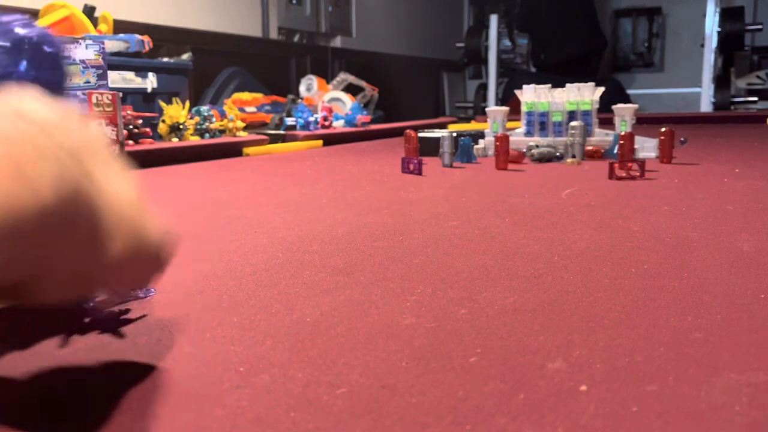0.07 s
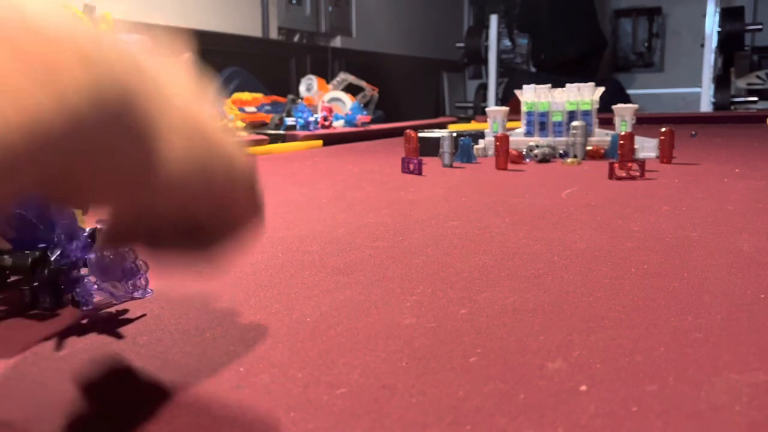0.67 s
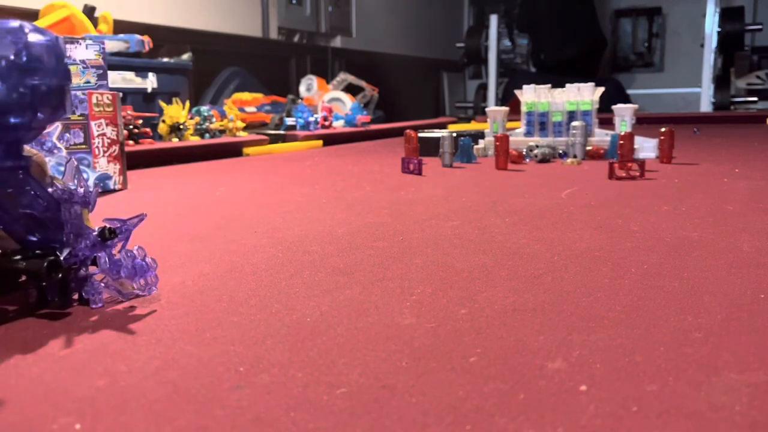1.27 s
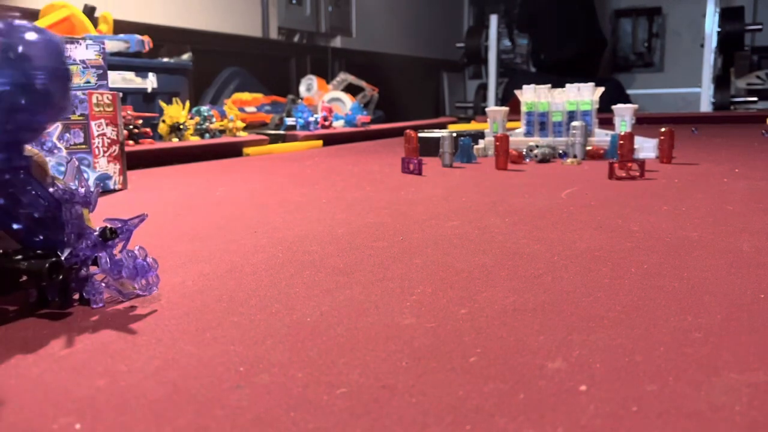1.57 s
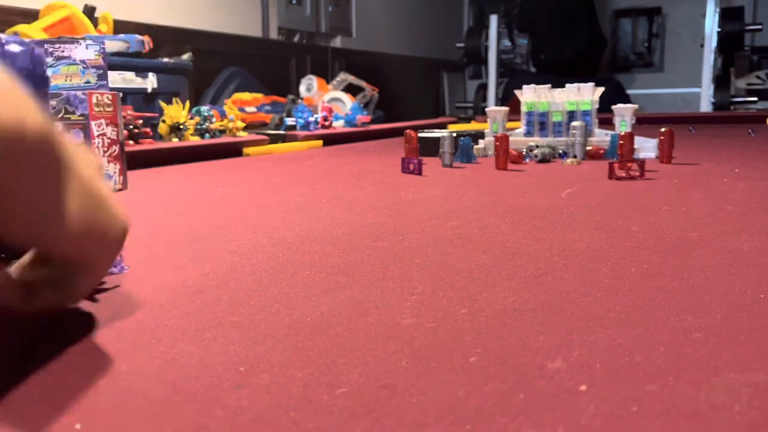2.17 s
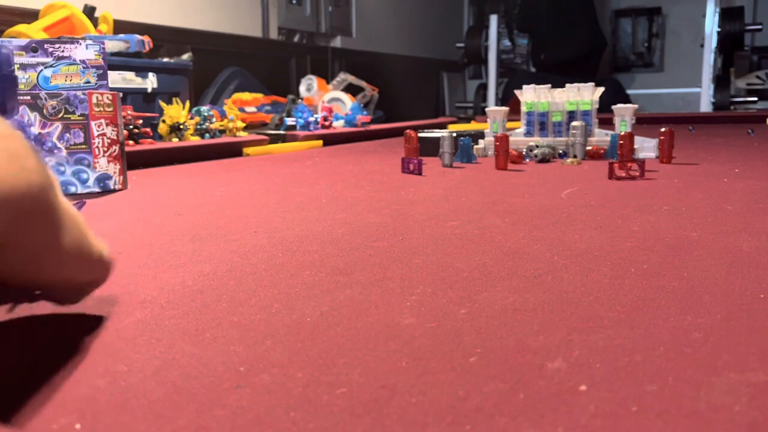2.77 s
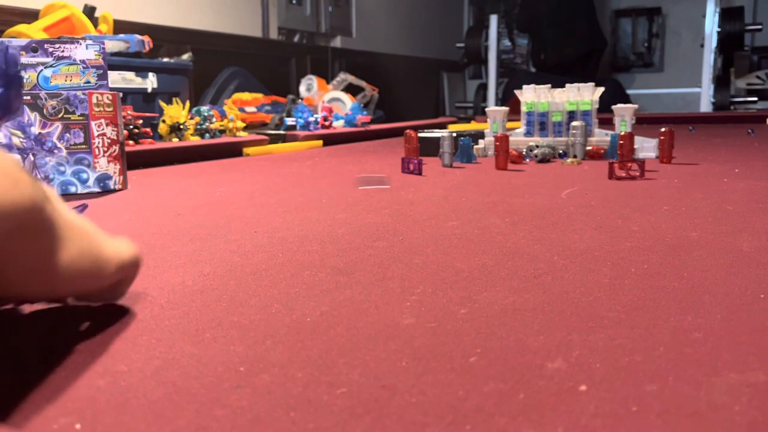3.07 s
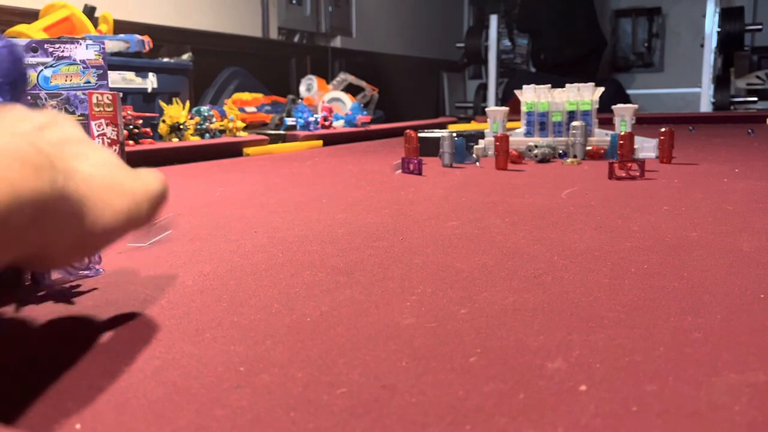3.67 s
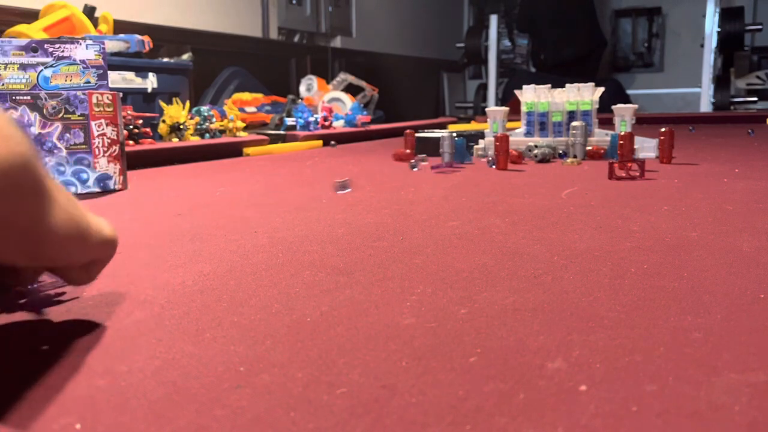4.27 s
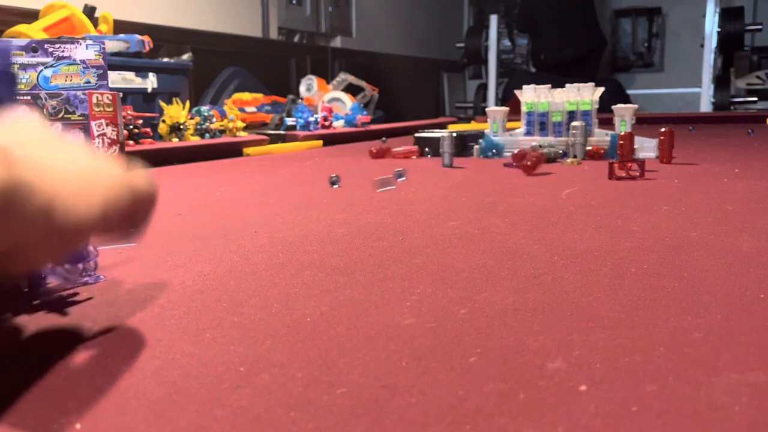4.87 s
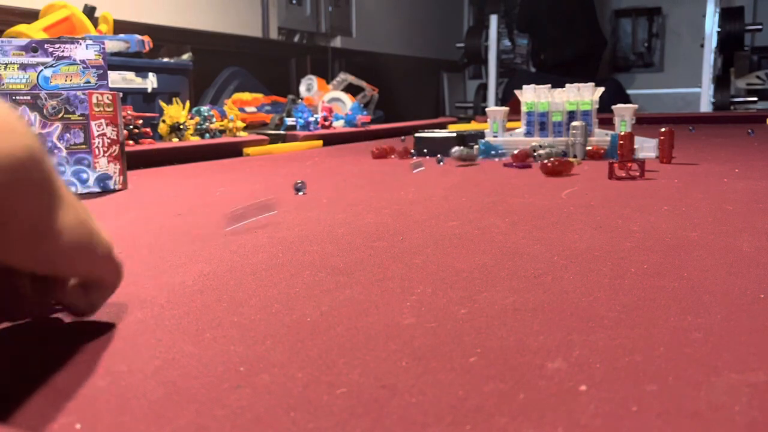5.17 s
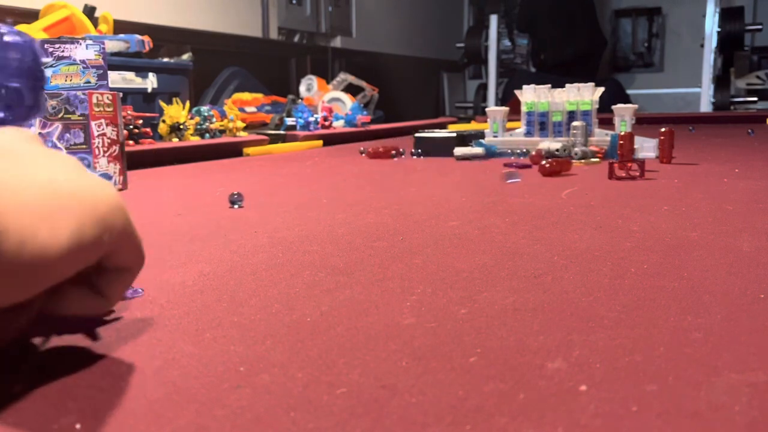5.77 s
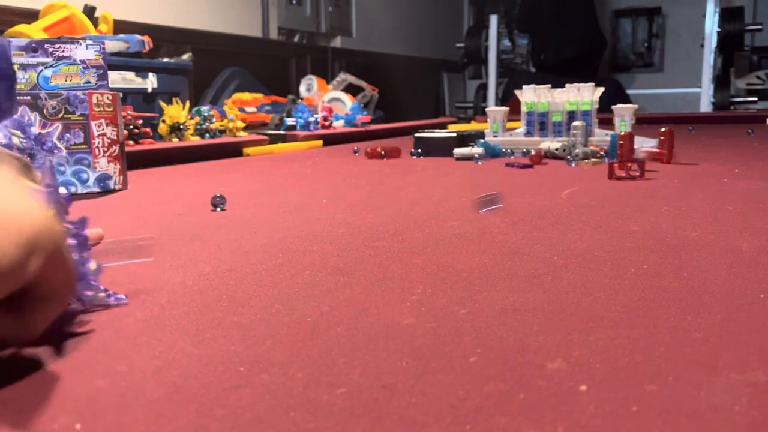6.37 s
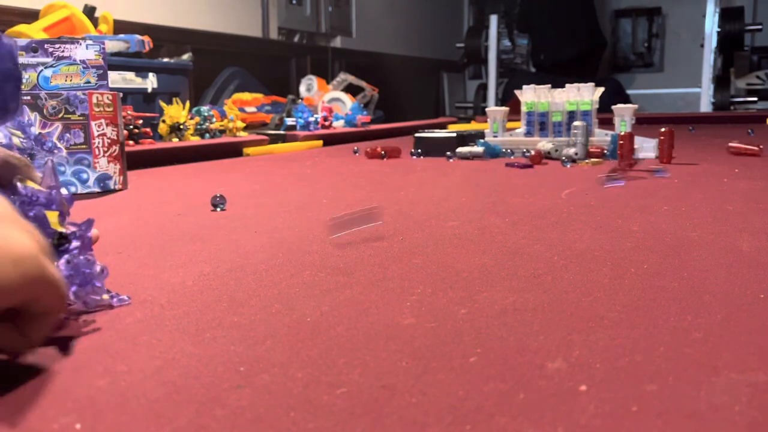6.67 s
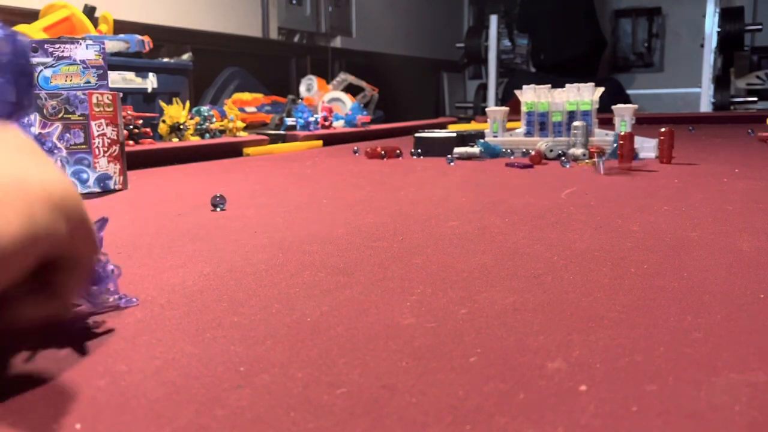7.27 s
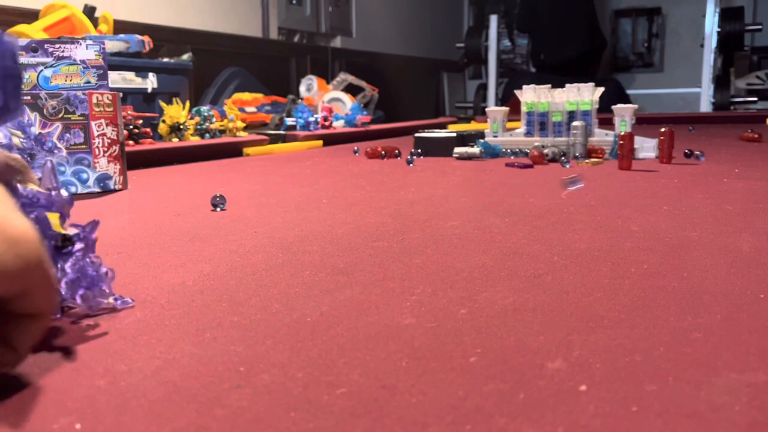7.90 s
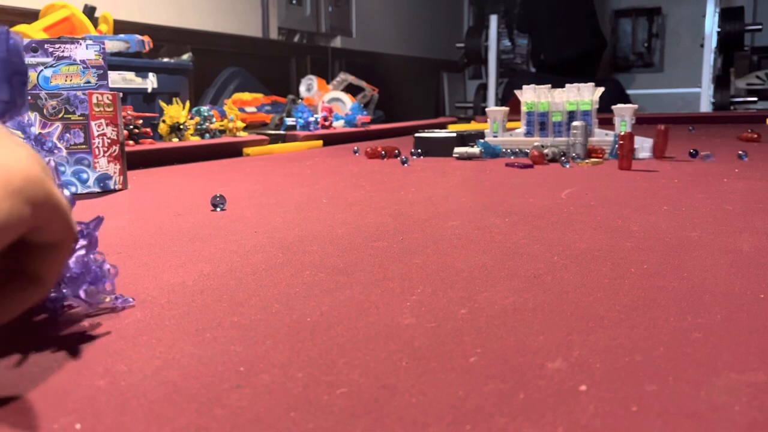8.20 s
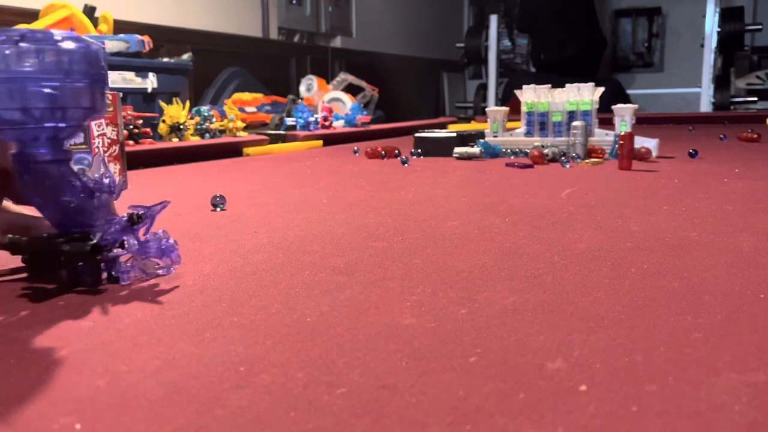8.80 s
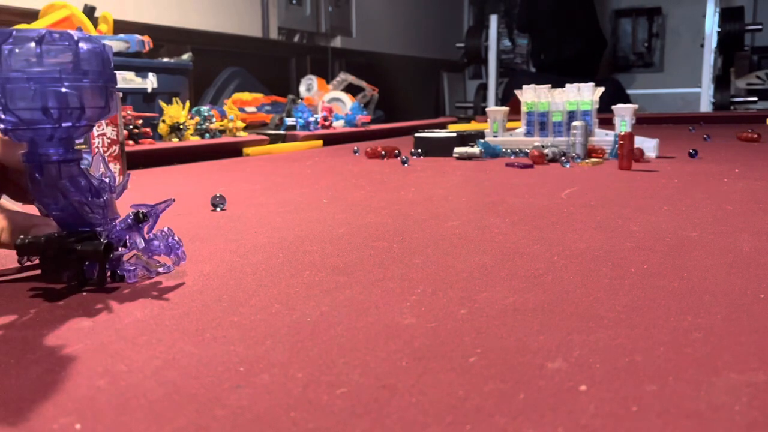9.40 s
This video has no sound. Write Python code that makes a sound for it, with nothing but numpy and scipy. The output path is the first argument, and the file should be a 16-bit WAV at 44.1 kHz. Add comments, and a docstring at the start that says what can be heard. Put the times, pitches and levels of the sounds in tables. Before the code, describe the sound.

For the first two seconds, marbles knock and rattle in the hollow plastic magazine of a toy shooter, close on the left, with sharp trigger clicks around 1 and 1.3 seconds. After a lull with a few faint ticks, firing starts at about 2.9 seconds. Sharp plastic snaps come roughly five times a second, mixed with empty clicks and the rattle of marbles dropping into place. The felt-covered table thuds dully under hard presses near 3, 3.4, 4.3 and 7 seconds. From 3.2 seconds, marbles clack against plastic targets farther away with a little room echo, most densely between 5 and 6 seconds, followed by duller, distant stray hits. The shots weaken and stop at about 8.5 seconds. Just after 9 seconds there is a hollow knock and a brief scrape as the toy is dragged over the felt. Quiet, low ventilation rumble and hum continue throughout.

```python
"""Toy marble shooter on a felt-covered table.

Close to the microphone pair, on the left, a hollow plastic magazine is shaken and its marbles rattle.
Then each press snaps a marble out through sprung claws and lets the next one drop. The marbles roll
off to crack against plastic targets and stray into far pieces; at last the toy is dragged over the
felt. Behind it all, ventilation rumbles and hums in the room."""
import sys
import numpy as np
from scipy import signal
from scipy.fft import rfft, irfft
from scipy.io import wavfile
from scipy.ndimage import uniform_filter1d

SR = 44100
rng = np.random.default_rng(int(sys.argv[2]) if len(sys.argv) > 2 else 0)


def to_wav(sig):
    """Store sig (one row per channel, or 1-D mono) as 16-bit WAV at the path in sys.argv[1].

    Samples outside -1..1 are clipped; the rate is SR.
    """
    pcm = np.clip(np.atleast_2d(sig), -1, 1) * 32767
    pcm = np.round(pcm).astype(np.int16)
    wavfile.write(sys.argv[1], SR, pcm.T)  # frames by channels


N = 416304
TIME = np.arange(N) / SR

# Marbles snapping through the claws. Each row: start in seconds, relative level in dB.
SNAPS = [(2.9089, -5), (3.4453, -2), (3.641, -5), (3.8518, -5), (4.0284, -8.5), (4.2822, -3),
         (4.4781, -4.5), (4.6743, -6.5), (4.8662, -6), (5.0807, -7.5), (5.2546, -7), (5.454, -4.5),
         (5.943, -8), (6.1546, -6), (6.3837, -6), (6.558, -4), (6.7431, -6.5), (7.0091, -5.5), (7.2389, -8),
         (7.422, -7), (7.642, -7.5), (7.8118, -9), (8.0558, -7.5), (8.4495, -15.5)]
# Dry clicks that release no marble: trigger clicks and faint handling ticks of the toy. Each row: start in
# seconds, relative level in dB.
EMPTY_CLICKS = [(0.9778, -5.5), (1.345, -2), (1.35, -2), (2.346, -35.5), (2.534, -41.5), (2.6074, -23),
                (2.7124, -24), (2.8579, -33.5), (3.001, -5), (3.756, -4.5), (5.678, -7.5), (5.913, -6),
                (6.018, -9.5), (6.1, -9.5), (6.2477, -7.5), (6.369, -2), (6.722, -5.5), (7.338, -16),
                (7.458, -10.5), (7.6, -7.5), (8.4281, -14.5), (8.589, -23.5)]
# Tone of a struck plastic piece. Each row: frequency in Hz, relative level in dB.
PIECE_SPECTRUM = [(150, -39.5), (550, -12), (1300, -10.5), (3800, -10), (9000, -15.5), (16000, -27)]
# Phase of a source close on the left. Each row: frequency in Hz, lead of the left channel in radians.
NEAR_LEAD = [(470, 0), (1400, 2.7), (1750, 2.4), (1950, 0)]


def shots(level_db=10, glass_db=-3, rub_db=-5, rub_s=0.0052, click_db=-6):
    """A marble rubs through sprung claws that snap shut and ring the glass; empty clicks are softer."""
    # Tone of the claws. Each row: frequency in Hz, relative level in dB.
    claw_spectrum = [(250, -17), (1200, -3.5), (2500, -20.5), (4100, -2), (5500, -8.5), (7400, -7.5),
                     (9000, -5.5), (14000, -8.5), (16000, -20.5)]
    # Marble and claw modes. Each row: frequency in Hz, relative level in dB, t60 in seconds.
    glass_modes = [(4520, -2, 0.0069), (7250, 1.5, 0.008)]
    contacts, rings = np.zeros((2, N))
    t = TIME[:SR // 6]
    for s, db in list(SNAPS) + [(s, db + click_db) for s, db in EMPTY_CLICKS]:
        add(contacts, s, gain_of(db) * blow(crack_t60=0.0055, ring_t60=0.02, ring_db=-2.5))
        rub = unit(rng.standard_normal(len(t))[:round(rub_s * SR)])
        add(contacts, s - rub_s, gain_of(db + rub_db) * rub)
        ring = 0
        for hz, mode_db, t60 in glass_modes:
            mode = np.sin(2 * np.pi * hz * rng.normal(1, 0.0033) * t) * dying(t, t60)
            ring += gain_of(mode_db) * unit(mode)
        add(rings, s, gain_of(db + rng.normal(glass_db, 2)) * ring)
    return gain_of(level_db) * (colour(contacts, claw_spectrum) + rings)


def magazine(rattle_db=-16.5, recoil_db=-6, knock_db=6, knock_ring_db=27, bounce_ring_db=22.5,
             drop_ring_db=-4, wander=0.035, wander_s=0.04):
    """Marbles knock on the shell and ring the air inside; knocks and shots set the rest bouncing."""
    # Marbles thrown at the wall. Each row: start in seconds, relative level in dB, hollow ring in dB.
    jolts = [(0.0014, -7, -15.5), (0.0593, -9, -22.5), (0.2862, -9, -35.5), (0.3087, -6.5, -15.5),
             (0.5514, -15, -16), (0.9219, -19.5, -11.5), (0.9921, -6.5, -16), (1.0193, -2.5, -20.5),
             (1.2481, -11.5, -12), (1.4861, -2.5, -11), (1.603, -18, -8), (1.7928, -22.5, -17.5),
             (1.9804, -28.5, -8), (2.0178, -25, -23), (2.142, -29, -12), (2.9009, -10, -15.5),
             (3.207, -8.5, -12), (4.1268, -8, -12), (4.4576, -12.5, -13), (4.6209, -12, -12),
             (4.9301, -14.5, -12), (5.4249, -11.5, -12), (7, -6, -15), (7.3883, -9.5, -11),
             (9.168, -16.5, -3.5)]
    # Marbles dropping after a shot. Each row: start in seconds, relative level in dB.
    drops = [(2.9557, -13.5), (3.514, -13.5), (3.883, -18), (3.918, -17), (4.355, -11), (4.372, -24),
             (4.421, -24), (4.562, -23), (4.979, -15), (5.111, -15), (5.568, -18), (6.136, -20),
             (6.18, -24), (6.441, -25.5), (6.589, -21), (6.614, -26.5), (6.817, -22.5), (7.036, -17),
             (7.1, -15.5)]
    # Air resonance of the magazine. Each row: time in seconds, frequency in Hz.
    hollow_pitch = [(0, 1475), (1.5, 1385), (3, 1310)]
    # Rattle of the remaining marbles. Each row: time in seconds, gain in dB.
    fullness = [(1.6, -5.5), (5.4, -2), (5.9, -8.5), (7.4, -14), (7.7, -15.5)]
    # Tone of the shell. Each row: frequency in Hz, relative level in dB.
    shell_spectrum = [(100, -6), (1000, 10.5), (2700, 0), (3250, 6), (3900, 5), (4900, 5.5), (6000, 2.5),
                      (7500, 3), (13500, 2), (16000, -26)]
    shell, bursts = np.zeros((2, N))
    knocks = list(jolts) + [(s, db, drop_ring_db) for s, db in drops]
    for s, db, ring_db in knocks:
        knock = blow(crack_t60=0.0035, ring_t60=0.045, ring_db=4.5)
        hz = np.interp(s, *np.transpose(hollow_pitch)) * rng.normal(1, wander)
        burst = unit(resonate_twice(knock, hz, width_hz=340))
        add(shell, s, gain_of(db + knock_db) * knock)
        add(bursts, s, gain_of(db + ring_db + knock_ring_db) * burst)
    bounces = chatter() * gain_of(rattle_db + follow(fullness))
    recoils = [(s, db + recoil_db) for s, db in list(SNAPS) + list(EMPTY_CLICKS)]
    shell += bounces * unrest([(s, db) for s, db, _ in knocks] + recoils)
    air = bounces * unrest([(s, db + ring_db / 3) for s, db, ring_db in knocks])
    # Shifting marbles bend the hollow's pitch and damp it, so its ring is broad.
    bend = evened(uniform_filter1d(rng.standard_normal(N), round(wander_s * SR)))
    hollow = resonate_twice(air, follow(hollow_pitch) * (1 + wander * bend), width_hz=540)
    return colour(shell, shell_spectrum) + bursts + gain_of(bounce_ring_db) * hollow


def chatter(spots=16, spot_db=10):
    """Small bounces; every spot of the shell answers with its own pitch."""
    ticks = np.zeros(N)
    for hz in np.geomspace(2000, 12000, spots):
        tick = blow(crack_t60=0.012, ring_t60=0.05, ring_db=0.5)
        tick = unit(tick + gain_of(spot_db) * resonate(tick, hz, width_hz=600))
        ticks += signal.oaconvolve(grains(per_s=20, spread_db=3), tick)[:N]
    return evened(ticks)


def targets(level_db=13, piece_db=10, body_db=28, rebound_db=-14, ping_db=-23, room_db=-8):
    """A crack and three rebounds; the piece rings, heavy ones add a low clack, and every hit carries a faint
    ping near 3.8 kHz."""
    # Marbles striking targets. Each row: start in seconds, relative level in dB, pitch in Hz,
    # weight of the body in dB, distance as diffuse sound in dB.
    hits = [(3.229, 0, 2320, -16.5, 0), (3.795, 0, 1210, -18, 3), (4.148, -5.5, 1510, -35, -5),
            (4.152, -3, 2230, -25.5, -17), (4.708, -2, 1380, -17, -0.5), (5.17, -4, 3460, -15, 8),
            (5.313, 1, 1200, -28, 2), (5.34, -6, 2450, -13, -0.5), (5.385, -6, 1270, -47, 5),
            (5.535, -12, 3430, -13, 4.5), (5.766, -14, 1900, -28, -2), (5.783, -3, 1350, -23, 2),
            (6.341, -11.5, 2500, -24, -8), (7.181, -5, 2800, -27, 4), (7.466, -11.5, 2790, -23, 5),
            (8.108, -11.5, 2680, -20.5, -8.5), (8.241, -17, 2120, -16, 11)]
    direct, diffuse = np.zeros((2, N))
    for s, db, hz, weight_db, distance_db in hits:
        hit = blow(crack_t60=0.0027, ring_t60=0.058, ring_db=distance_db)
        for k, delay_s in enumerate(np.cumsum(rng.uniform(0.016, 0.02, size=3))):
            rebound = blow(crack_t60=0.00045, ring_t60=0.016, ring_db=-5.5)
            add(hit, delay_s, gain_of(rebound_db + distance_db / 2 - 2 * k) * rebound)
        piece = gain_of(piece_db) * resonate(hit, hz, width_hz=800)
        body = gain_of(body_db + weight_db) * resonate(hit, hz=660, width_hz=500)
        crack = signal.lfilter(*signal.butter(2, 1200, "high", fs=SR), hit)
        ping = unit(resonate_twice(hit, hz=rng.normal(3820, 60), width_hz=600))
        clack = unit(colour(crack + piece + body, PIECE_SPECTRUM))
        sound = gain_of(db + level_db) * (clack + gain_of(ping_db) * ping)
        add(direct, s, sound)
        add(diffuse, s, gain_of(room_db + distance_db / 2) * sound)
    return direct + room(diffuse)


def strays(level_db=12, ring_t60=0.09, room_db=2):
    """Stray marbles hit thin pieces at the far end: a dull clack with a rough, short ring."""
    # Far hits. Each row: start in seconds, relative level in dB, pitch in Hz.
    far_hits = [(5.823, -19, 3800), (6.507, -19.5, 4100), (6.8977, -20, 3780), (7.277, -18.5, 3730),
                (7.8334, -13.5, 1777), (8.85, -23, 1760), (9.011, -36, 1630)]
    # Modes of a thin piece. Each row: multiple of the pitch, relative level in dB.
    thin_modes = [(.64, -7.5), (1, 3), (1.3, -14.5), (2.14, 4.5)]
    clacks, t = np.zeros(N), TIME[:SR // 6]
    for s, db, hz in far_hits:
        tap = unit(colour(blow(crack_t60=0.00295, ring_t60=0.034, ring_db=8.5), PIECE_SPECTRUM))
        ring = 0
        for ratio, mode_db in thin_modes:
            buzz = rng.standard_normal(len(t)) * dying(t, ring_t60)
            ring += gain_of(mode_db) * unit(resonate_twice(buzz, ratio * hz, width_hz=330))
        add(clacks, s, gain_of(db + level_db) * (tap + unit(ring)))
    distant = signal.lfilter(*signal.butter(2, [850, 5500], "band", fs=SR), clacks)
    return distant + gain_of(room_db) * room(distant)


def table_thuds(level_db=18, push_db=-26, thud_hz=150, width_hz=130):
    """The padded table thuds when the toy is pushed down hard, and rumbles a little under each shot."""
    # Hard presses. Each row: start in seconds, relative level in dB.
    presses = [(2.9, -12), (3.441, -13), (4.274, -16.5), (7.001, -12.5)]
    push = gain_of(push_db) * unrest(SNAPS) * rng.standard_normal(N)
    thuds = np.zeros(N)
    for s, db in presses:
        thud = resonate(blow(crack_t60=0.017, ring_t60=0.7, ring_db=-1), thud_hz, width_hz)
        add(thuds, s, gain_of(db + level_db) * unit(thud))
    return resonate(thuds + resonate(push, thud_hz, width_hz), thud_hz, width_hz)


def drag(pan_db=2.8, room_db=-12.5):
    """The base of the toy sticks and slips over the felt, left of the microphones."""
    # Course of the drag. Each row: time in seconds, gain in dB.
    drag_curve = [(9.115, -70), (9.121, -27.5), (9.16, -28), (9.198, -15.5), (9.224, -21), (9.285, -18.5),
                  (9.304, -15.5), (9.33, -23), (9.44, -29.5)]
    # Tone of rubbed felt. Each row: frequency in Hz, relative level in dB.
    felt_spectrum = [(200, -15), (600, 1), (880, 7.5), (1200, -6.5), (1900, -16), (12000, -22),
                     (16000, -52.5)]
    catches = grains(per_s=350, spread_db=3)
    slips = signal.oaconvolve(catches, blow(crack_t60=0.002, ring_t60=0.006, ring_db=-9))[:N]
    friction = evened(evened(slips) + rng.standard_normal(N))
    scrape = gain_of(follow(drag_curve)) * colour(friction, felt_spectrum)
    direct = steer(scrape, NEAR_LEAD) * gain_of([[pan_db], [-pan_db]])
    return direct + gain_of(room_db) * room(scrape)


def rolling(level_db=-46, trip_s=0.4):
    """Each fired marble rumbles across the felt and stirs the table's low modes."""
    # Modes of the tabletop. Each row: frequency in Hz, width in Hz, relative level in dB.
    slab_modes = [(73.9, 7.9, 5), (167.7, 28, 0.5)]
    power = np.zeros(N)
    for s, db in SNAPS:
        add(power, s, gain_of(db) ** 2 * np.maximum(1 - TIME[:SR] / trip_s, 0))
    bumps = rng.standard_normal(N)
    rumble = sum(gain_of(db) * evened(resonate_twice(bumps, hz, width)) for hz, width, db in slab_modes)
    return gain_of(level_db) * np.sqrt(power) * rumble


def ventilation(rumble_db=-44, apart_hz=700):
    """Low ventilation rumble, alike in both channels in the bass, with a few wavering hum lines."""
    # Tone of the rumble. Each row: frequency in Hz, relative level in dB.
    air_spectrum = [(25, -16), (58, 2), (90, 5), (135, -5.5), (330, -11.5), (800, -28.5), (3800, -42),
                    (15000, -91)]
    # Hum lines. Each row: frequency in Hz, level in dB.
    hum_lines = [(76, -49), (116, -55.5), (169, -55), (350, -57.5)]
    hz = np.fft.rfftfreq(N, 1 / SR)
    mid, side = rfft(rng.standard_normal((2, N))) * gain_of(read(air_spectrum, hz))
    side = side * hz / (hz + apart_hz)
    rumble = gain_of(rumble_db) * evened(irfft(np.array([mid + side, mid - side]), N))
    drifts = np.cumsum(rng.standard_normal((len(hum_lines), N)), axis=1) * np.sqrt(14 / SR)
    hum = sum(gain_of(db) * evened(np.sin(2 * np.pi * line_hz * TIME + drift))
              for (line_hz, db), drift in zip(hum_lines, drifts))
    return rumble + hum


def room(x, early_db=8, early_t60=0.018, paths=3):
    """Strong early reflections, then a tail whose treble dies first; the paths shift as things move."""
    # Ring of the room. Each row: frequency in Hz, t60 in seconds.
    decay_times = [(200, 0.55), (4000, 0.28), (14000, 0.07)]
    t, reflected = TIME[:SR // 2], 0
    for k in range(paths):
        taps = rng.standard_normal((2, len(t))) * (t > 0.002)
        taps *= 1 + gain_of(early_db) * dying(t, early_t60)
        hz, age, bands = signal.stft(taps, SR)
        mid, side = bands * dying(age, read(decay_times, hz)[:, None])
        side = side * (hz / (hz + 500))[:, None]  # the bass is alike in both channels
        tails = signal.istft(np.array([mid + side, mid - side]), SR)[1]
        share = 2 * np.cos(np.pi * (2 * TIME + k / paths)) / np.sqrt(paths)
        reflected += signal.fftconvolve((share * x)[None], unit(tails), axes=1)[:, :N]
    return reflected


def blow(crack_t60, ring_t60, ring_db):
    """One contact: a sharp crack, then the dense, quickly dying modes of plastic."""
    t = TIME[:SR // 6]
    crack, ring = rng.standard_normal((2, len(t)))
    return unit(crack * dying(t, crack_t60)) + gain_of(ring_db) * unit(ring * dying(t, ring_t60))


def grains(per_s, spread_db):
    """A random train of contacts, most small and a few large."""
    size = gain_of(spread_db * np.minimum(rng.exponential(1, N), 3.5))
    return evened(size * rng.choice([-1, 1], N) * (rng.random(N) < per_s / SR))


def unrest(jolts, settle_s=0.56):
    """Size of the bouncing after jolts (s, dB): it ends in a finite time, sooner after a soft one."""
    power = np.zeros(N)
    for s, db in jolts:
        remaining = np.maximum(1 - TIME[:SR] / (settle_s * gain_of(db / 3)), 0)
        add(power, s, gain_of(db) ** 2 * remaining ** 3)
    return np.sqrt(power)


def resonate(x, hz, width_hz):
    """A resonance of gain 1 whose centre may move."""
    turn = np.exp(2j * np.pi * np.cumsum(hz * np.ones(len(x))) / SR)
    pole = np.exp(-np.pi * width_hz / SR)
    return 2 * (turn * signal.lfilter([1 - pole], [1, -pole], x / turn + 1e-18)).real


def resonate_twice(x, hz, width_hz):
    """Two like resonances in series, for steeper skirts."""
    return resonate(resonate(x, hz, width_hz), hz, width_hz)


def colour(x, spectrum):
    """Causal filter of unit energy with the given spectrum."""
    log_gain = np.log(gain_of(read(spectrum, abs(np.fft.fftfreq(2048, 1 / SR)))))
    taps = np.fft.ifft(np.exp(np.conj(signal.hilbert(log_gain)))).real
    return signal.oaconvolve(x, unit(taps[:len(taps) // 2]))[:len(x)]


def steer(x, lead, side=None):
    """Gives the two channels a phase and level difference that depends on frequency."""
    hz, sign = np.fft.rfftfreq(2 * N, 1 / SR), np.array([[0.5], [-0.5]])
    balance = gain_of(sign * read(side, hz)) if side else 1
    return irfft(rfft(x, 2 * N) * balance * np.exp(1j * sign * read(lead, hz)))[:, :N]


def gain_of(db):
    return 10 ** (np.asarray(db) / 20)


def evened(x):
    """Scales to an rms of 1."""
    return x / np.sqrt(np.mean(x ** 2) + 1e-20)


def unit(x):
    """Scales to an energy of 1."""
    return x / np.linalg.norm(x)


def read(points, hz):
    """Interpolates along a logarithmic frequency axis."""
    point_hz, value = np.transpose(points)
    return np.interp(np.log(hz + 1), np.log(point_hz + 1), value)


def follow(curve):
    return np.interp(TIME, *np.transpose(curve))


def add(mix, s, sound):
    part = mix[max(round(s * SR), 0):][:len(sound)]
    part += sound[:len(part)]


def dying(t, t60):
    return np.exp(-np.log(1000) * t / t60)


def scene(base_room_db=-11, rattle_room_db=-8):
    """The toy is close on the left and fairly dry, its tall magazine less so; targets are farther off."""
    # Balance of the nearby toy. Each row: frequency in Hz, left over right in dB.
    near_balance = [(400, -2), (1000, 7.5), (1600, -4.5), (2500, 9.5), (7000, 0)]
    base, rattle = shots() + table_thuds(), magazine()
    direct = steer(base + rattle, NEAR_LEAD, near_balance)
    reflected = room(gain_of(base_room_db) * base + gain_of(rattle_room_db) * rattle)
    return direct + reflected + drag() + rolling() + targets() + strays() + ventilation()


def record(dry, low_cut_hz=34, band_limit_hz=16300):
    """The microphone pair with its bass roll-off, full-scale clipping and band limit."""
    # Phase between the microphones. Each row: frequency in Hz, lead of the left one in radians.
    pair_lead = [(200, 0), (700, .5), (1400, 0), (3300, .1), (4700, .7), (6000, -.5), (8500, -3.14),
                 (12500, -6.3), (15200, -9.3)]
    heard = signal.lfilter(*signal.butter(2, low_cut_hz, "high", fs=SR), steer(dry, pair_lead))
    low_pass = signal.firwin(511, band_limit_hz, window=("kaiser", 9), fs=SR)
    return signal.oaconvolve(np.clip(heard, -1, 1), low_pass[None], "same")


dry = scene()
out = record(dry)
to_wav(out)
```